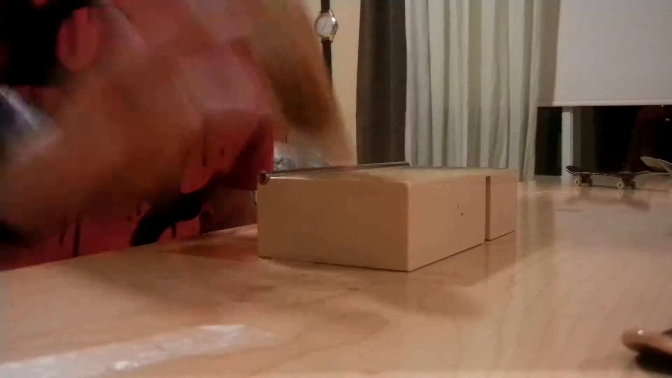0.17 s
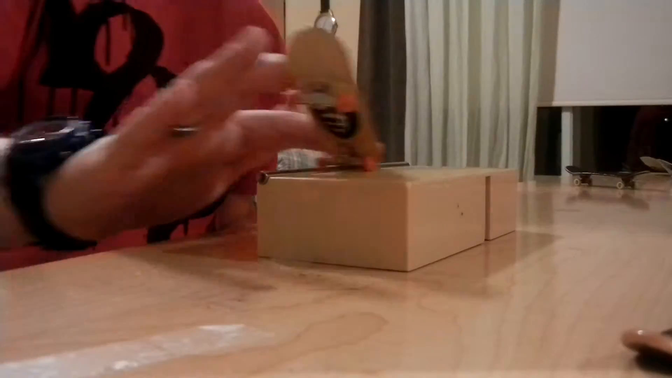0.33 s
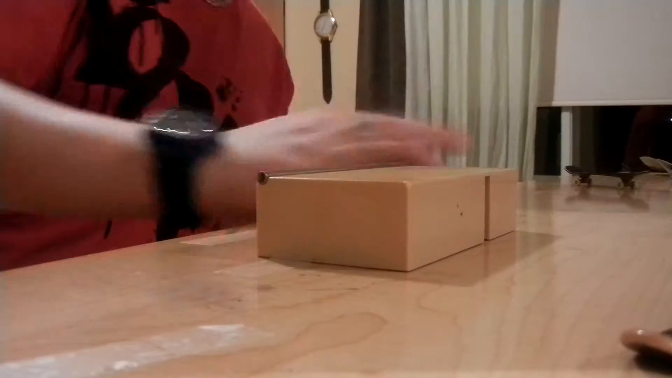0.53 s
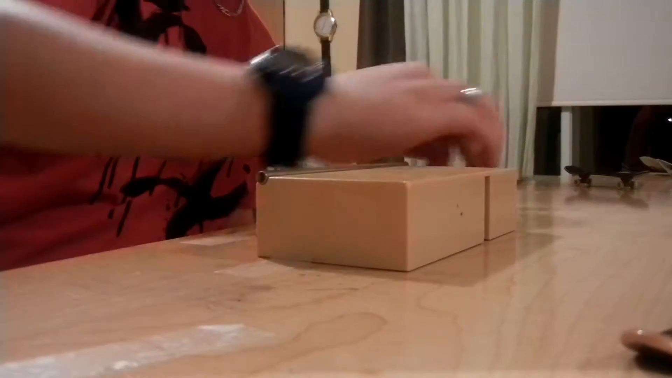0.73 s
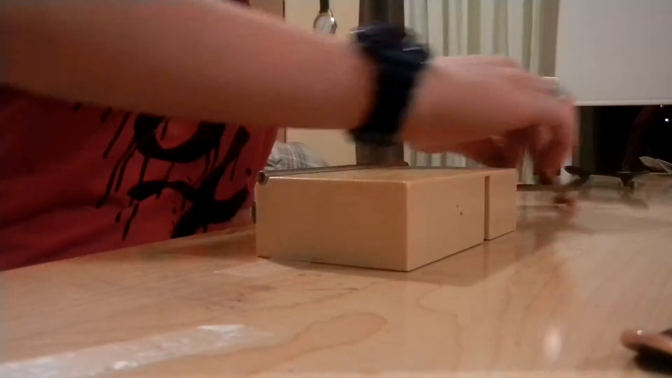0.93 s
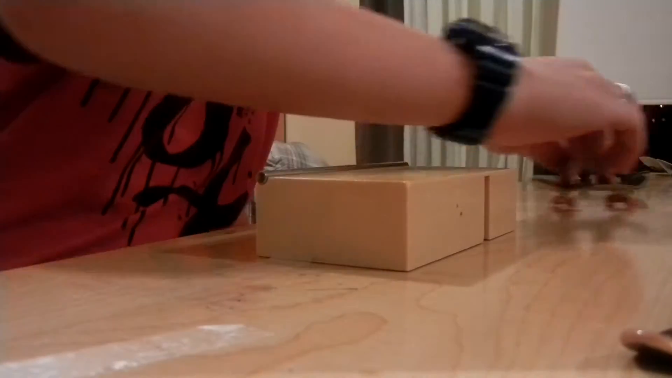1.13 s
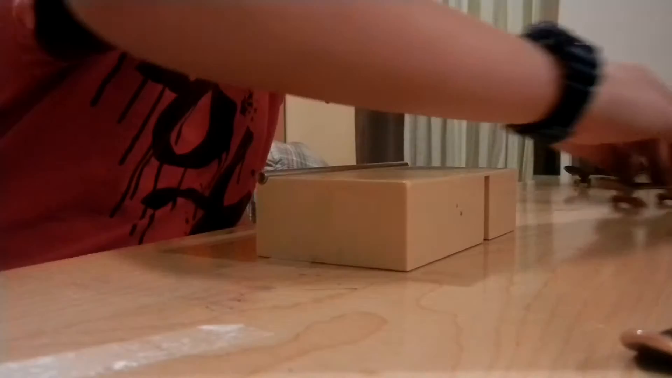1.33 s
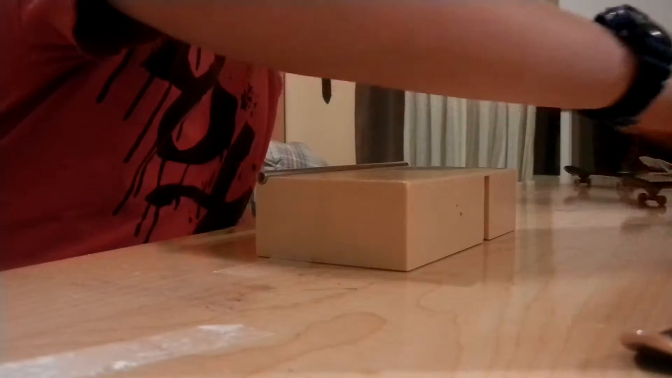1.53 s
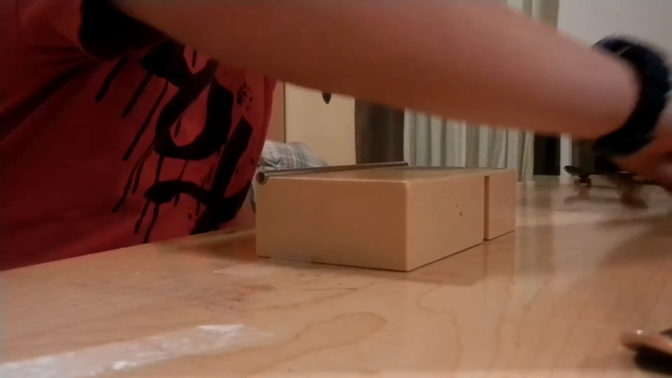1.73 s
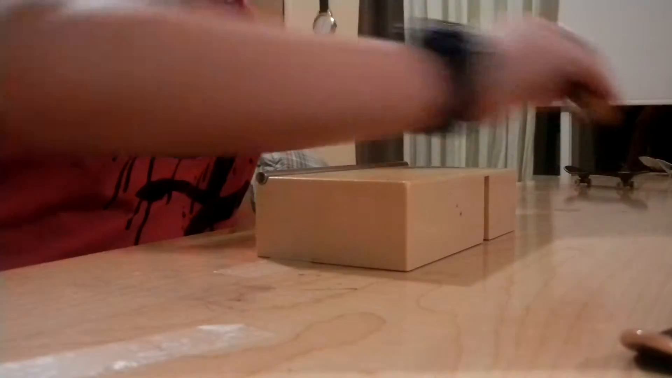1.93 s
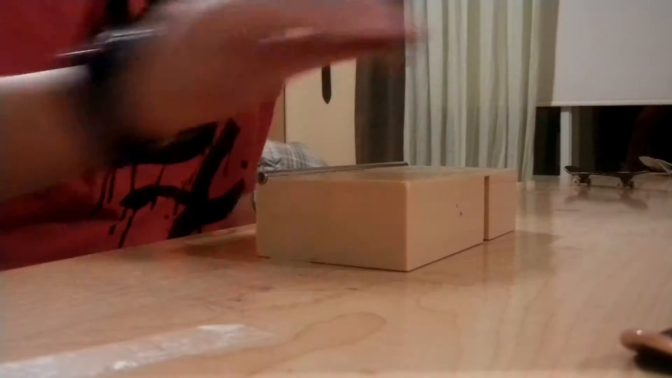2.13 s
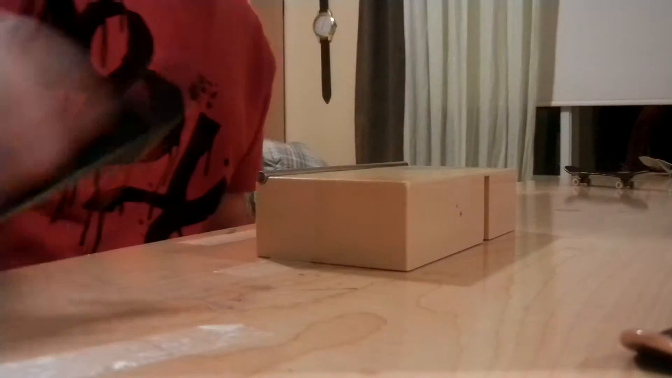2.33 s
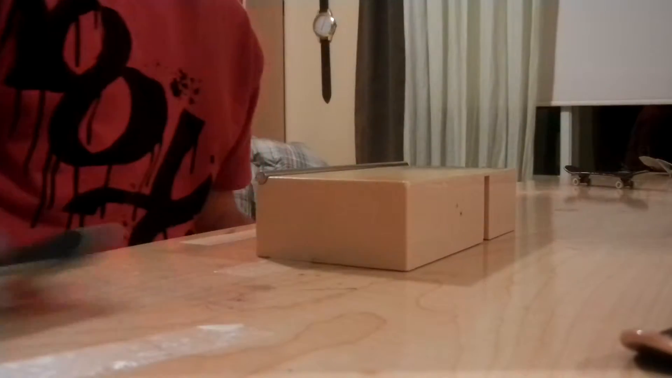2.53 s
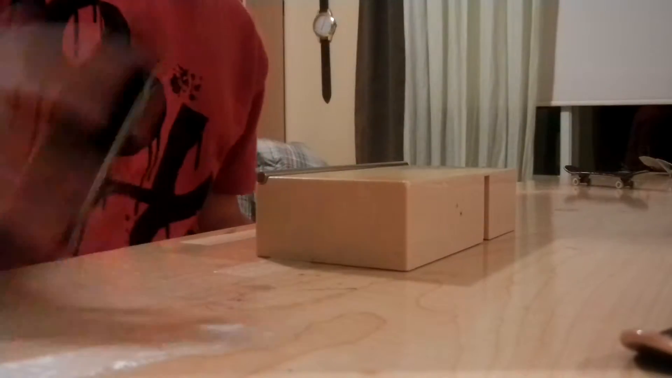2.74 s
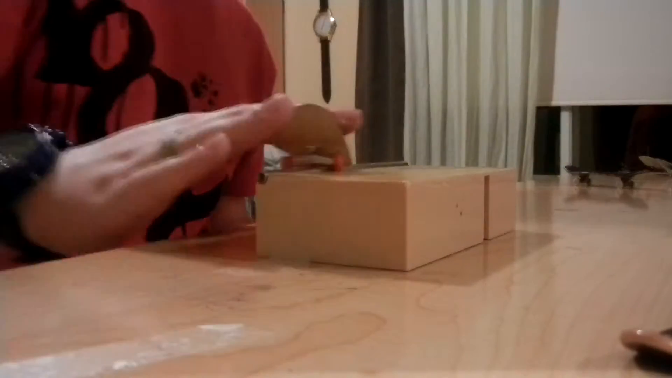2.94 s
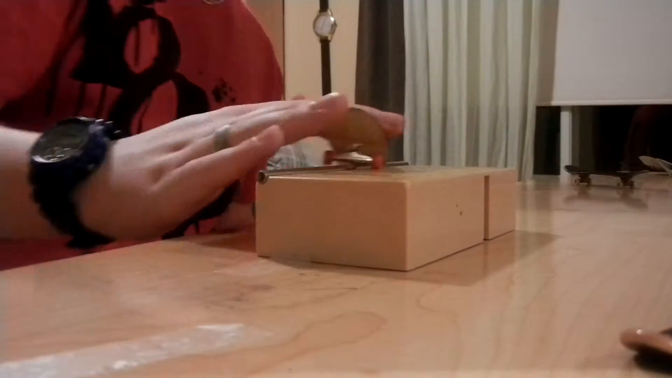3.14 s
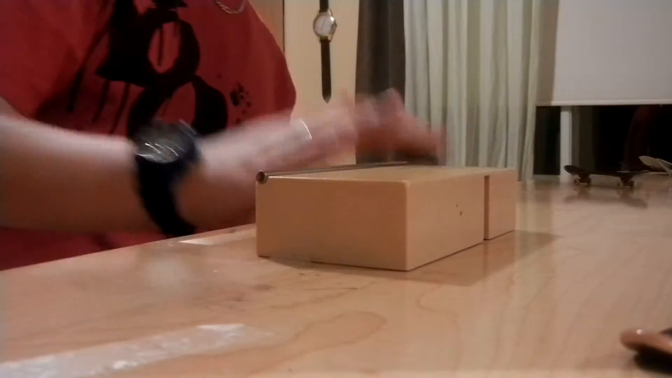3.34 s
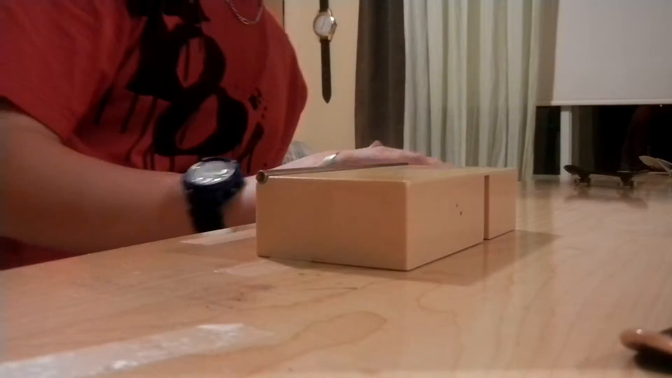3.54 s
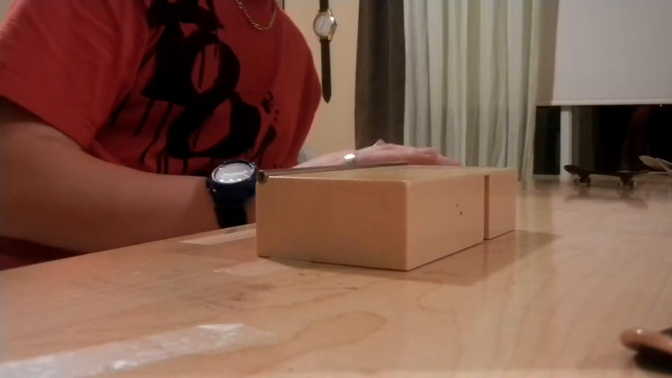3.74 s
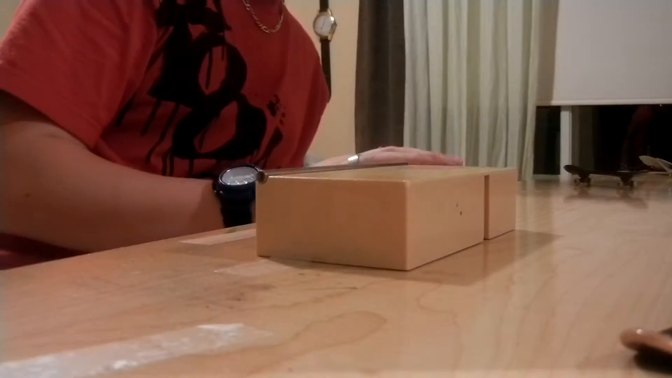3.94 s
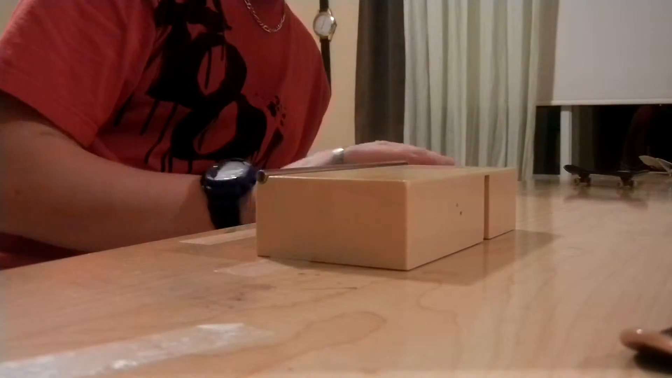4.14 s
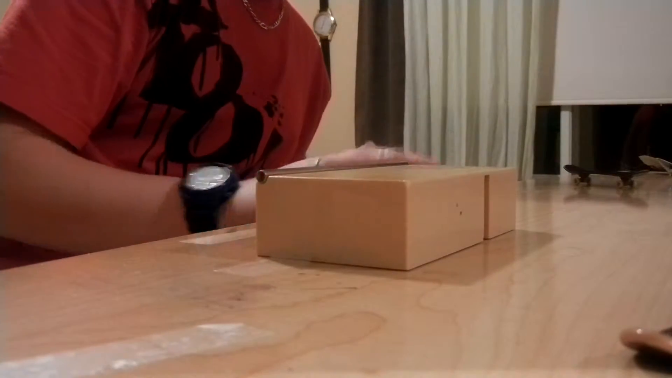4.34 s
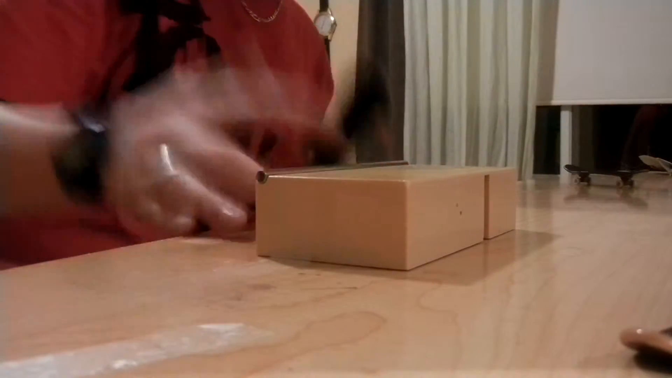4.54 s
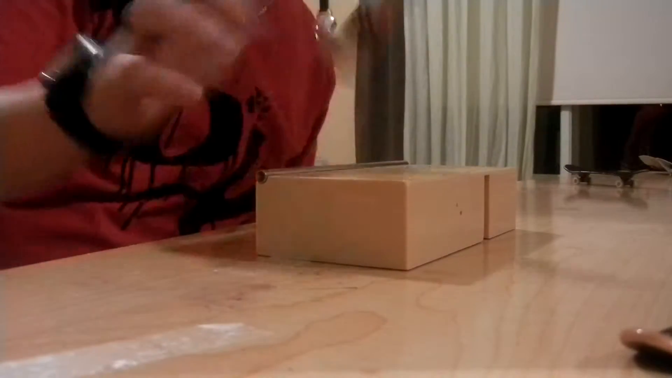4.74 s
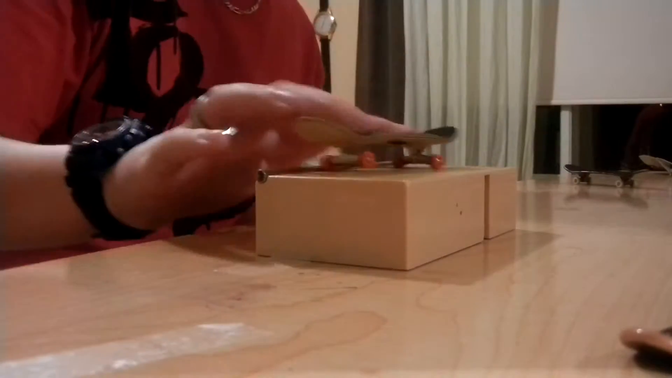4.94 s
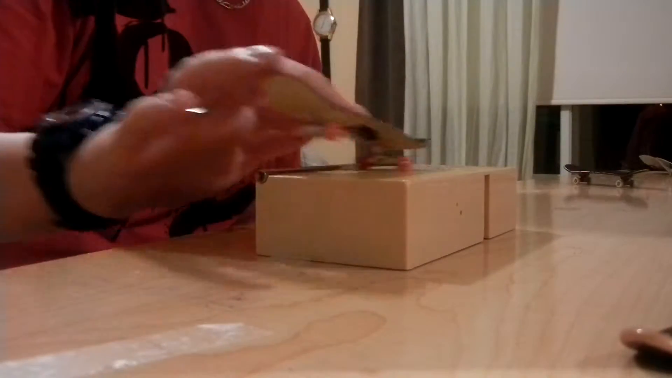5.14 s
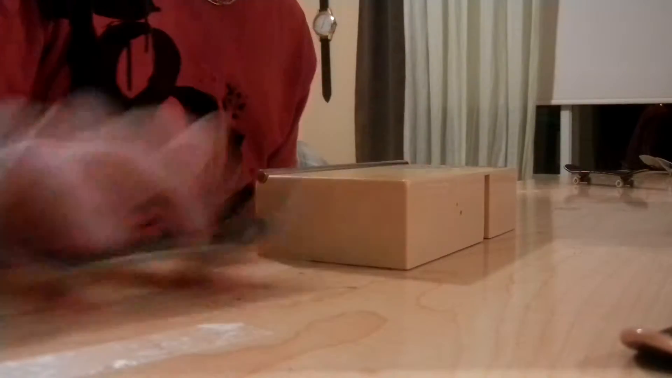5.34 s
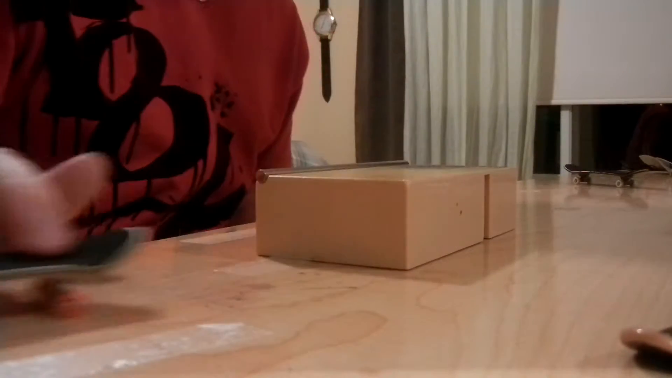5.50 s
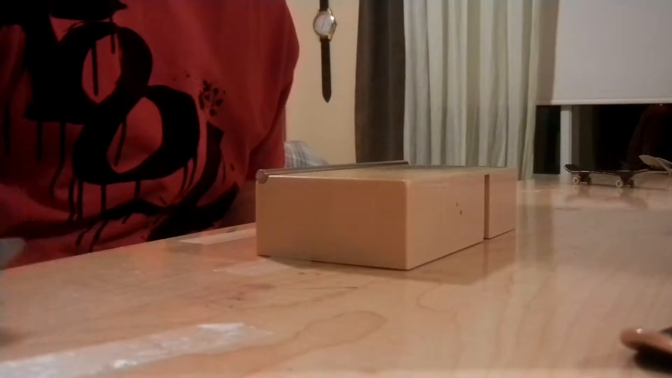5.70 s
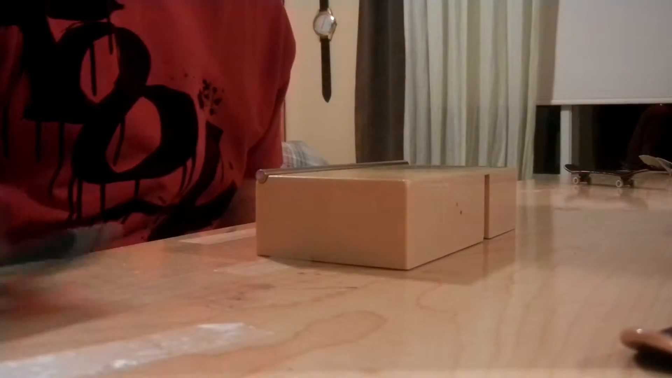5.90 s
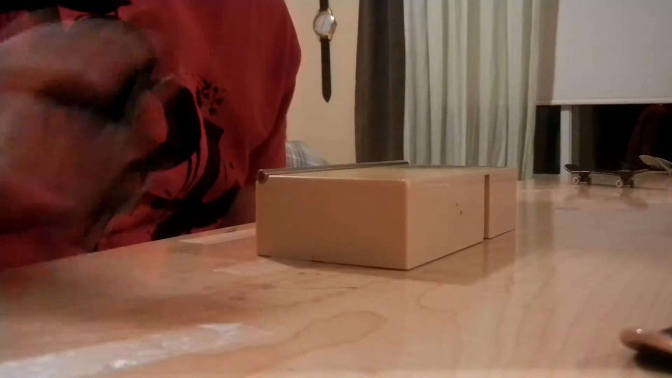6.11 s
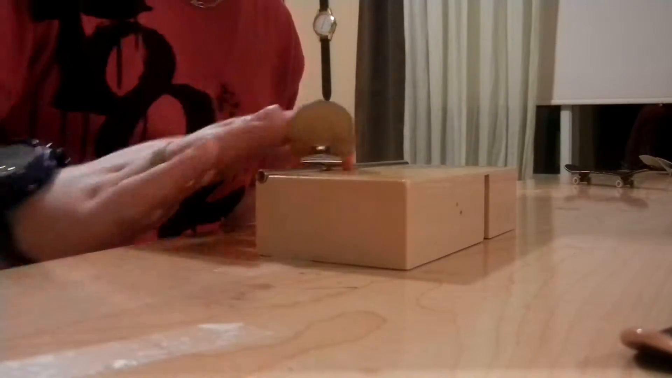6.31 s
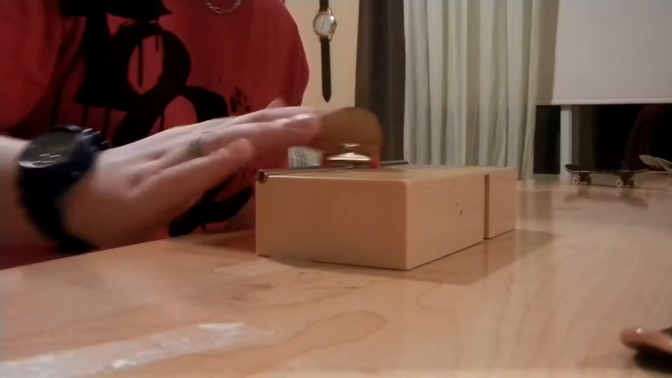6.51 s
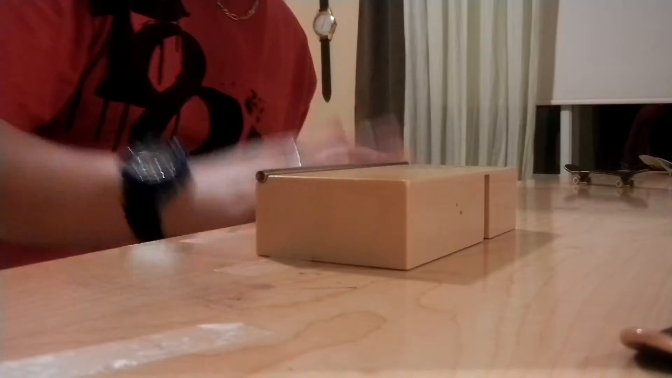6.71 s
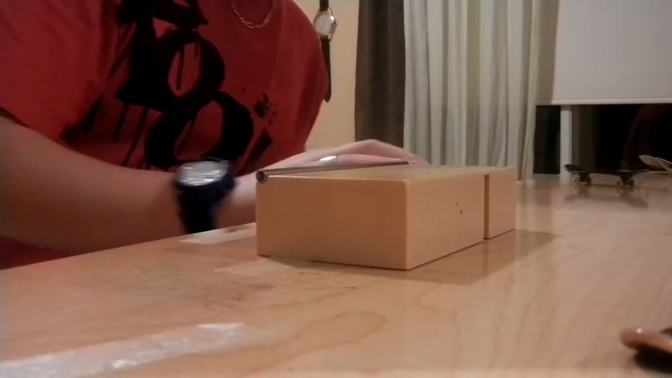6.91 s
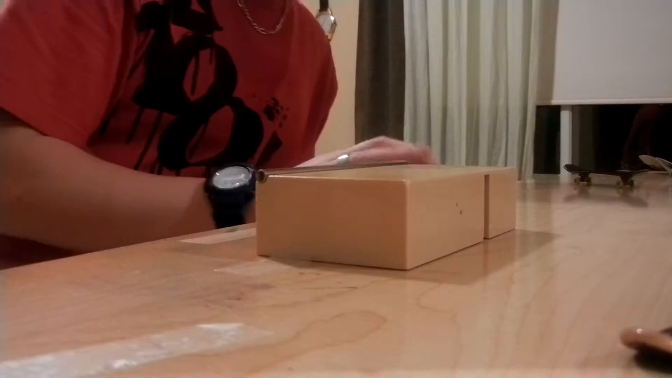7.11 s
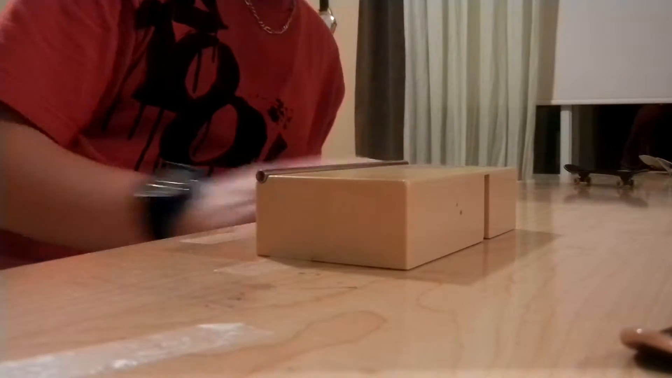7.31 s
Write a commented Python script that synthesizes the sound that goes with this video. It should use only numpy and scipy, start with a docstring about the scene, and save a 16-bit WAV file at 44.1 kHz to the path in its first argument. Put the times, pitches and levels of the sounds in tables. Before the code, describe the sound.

Close stereo sound in a small quiet room with a short echo. A trace of rolling and room noise cuts to silence, then returns at 0.12 s with the tail of a pop. The little board clacks onto a wooden box at 0.32, scrapes its metal edge with a hissing peak near 0.55, and smacks down at 0.65. From 0.8 to 1.6 the wheels skid sideways, growing louder in throbs and stuttering chirps. Soft taps and faint truck clicks follow around 1.9-2.2. Clacks at 2.5 and a rapid run-up at 2.7 lead to pops at 2.85-3.05, a swelling rasp to 3.4, landings to 3.7 and fading rolls. A whirring run-up at 4.6 pops, lands at 4.95, grinds until 5.4 and clacks at 5.49. Another run-up at 6.05, pops at 6.2-6.35, a grind to 6.75, double clack at 6.85, then light rolling until the end at about 7.4.

```python
"""A touch of rolling and room noise, a moment of silence, then the tail of a fingerboard pops.
Small room, wooden table, close stereo microphones: wheels roll on the grain as dense tiny impacts;
trucks land on a wooden box with struck modes and noise bursts, and grind and sing along its metal edge.
The board clacks back down; once the wheels skid sideways in throbs and stuttering chirps."""
import sys
import numpy as np
from scipy import signal
from scipy.fft import rfft, irfft
from scipy.io import wavfile
from scipy.ndimage import uniform_filter1d

SR = 44100
rng = np.random.default_rng(int(sys.argv[2]) if len(sys.argv) > 2 else 0)


def bounce(signal):
    """Save signal as a 16-bit WAV file at the path given by the first command-line argument."""
    frames = np.transpose(np.atleast_2d(signal))
    limited = np.clip(frames, -1, 1)
    pcm = np.round(limited * 32767).astype(np.int16)
    wavfile.write(sys.argv[1], SR, pcm)


N = 324576
T = np.arange(N) / SR  # time [s]
HIT_T = T[:SR // 3]  # time within one hit [s]
# Source levels are relative: the box and the room still act on them.


def undb(db):
    """Decibels to gain."""
    return 10 ** (np.asarray(db) / 20)


def unit(x):
    """Scale to rms 1."""
    return x / np.sqrt(np.mean(x ** 2))


def blow(x):
    """Scale a hit to the energy of 10 ms at rms 1."""
    return x / np.sqrt(np.sum(x ** 2) / (SR / 100))


def band(x, low_hz, high_hz):
    """Causal band-pass."""
    edges = [low_hz, min(high_hz, SR / 2 - 10)]
    sos = signal.butter(4, edges, "band", fs=SR, output="sos")
    return signal.sosfilt(sos, x + 1e-18)


def colour(x, points):
    """Causal minimum-phase filter with a (frequency [Hz], level [dB]) response."""
    hz, db = np.transpose(points)
    size = 4096
    bins_hz = np.arange(size // 2 + 1) * SR / size
    response_db = np.interp(np.log(bins_hz + 1), np.log(hz), db)
    cepstrum = irfft(np.log(undb(response_db)))
    # fold the cepstrum so that the response starts at once
    cepstrum[1:size // 2] *= 2
    cepstrum[size // 2 + 1:] = 0
    impulse = irfft(np.exp(rfft(cepstrum)))
    return signal.oaconvolve(x, impulse)[:len(x)]


def resonance(x, hz, width_hz):
    """One resonance, gain 1 at its centre."""
    return signal.lfilter(*signal.iirpeak(hz, hz / width_hz, fs=SR), x)


def fade(t, t60):
    """Exponential decay by 60 dB in t60 seconds."""
    return np.exp(-np.log(1000) * t / t60)


def burst(t60):
    """Noise that dies away."""
    return rng.standard_normal(len(HIT_T)) * fade(HIT_T, t60)


def flurry(x, t60):
    """Smear one contact into a quick run of smaller ones."""
    run = burst(t60) * (rng.random(len(HIT_T)) < 1500 / SR)
    run[0] = 1
    return signal.oaconvolve(x, run)[:len(x)]


def ring(modes, length=1, spread_db=2.0, detune=0.032):
    """Struck modes; shares and pitches depend on where the blow lands and how the fingers press."""
    hz, db, t60 = np.transpose(modes)[:, :, None]
    share, shift, side = rng.standard_normal((3, len(modes), 1))
    gain = np.sign(side) * undb(db + spread_db * share)
    tones = np.sin(2 * np.pi * hz * (1 + detune * shift) * HIT_T)
    return np.sum(gain * fade(HIT_T, t60 * length) * tones, axis=0)


def walk(rate):
    """Smooth random wander with rms 1, drawn anew about `rate` times a second."""
    k = int(SR / rate)
    steps = np.repeat(rng.standard_normal(N // k + 1), k)
    return unit(uniform_filter1d(uniform_filter1d(steps, k), k)[:N])


def song(hz, width_hz):
    """A narrow resonance that friction keeps ringing while its pitch moves."""
    phase = 2 * np.pi * np.cumsum(hz) / SR
    return unit(walk(width_hz) * np.sin(phase) + walk(width_hz) * np.cos(phase))


def stroke(start_s, hold_s, rise_db_per_s, fall_db_per_s, slope_db_per_s=0):
    """Gain of one movement: it swells up to its start, holds along a slope, then dies away."""
    t = T - start_s
    rise = rise_db_per_s * np.minimum(t, 0)
    slope = slope_db_per_s * np.clip(t, 0, hold_s)
    fall = fall_db_per_s * np.maximum(t - hold_s, 0)
    return undb(np.maximum(rise + slope - fall, -160))


def scattered(start_s, length_s, count):
    """Uneven moments spread over a stretch of time."""
    return start_s + length_s * (np.arange(count) + rng.random(count)) / count


def add(out, s, sound):
    """Mix a sound in at time s."""
    i = max(int(s * SR), 0)
    out[i:i + len(sound)] += sound[:N - i]


# Spectrum of the quiet room: (frequency [Hz], level [dB])
AIR = [(25, -5), (60, 4), (200, 7), (400, -2.5), (1500, -2.5), (3300, -1.5), (4500, -10), (8000, -13.5),
       (15000, -14.5)]
AIR_DB = -52  # the part common to both microphones


def air():
    """Quiet room noise, partly different at the two microphones."""
    shared, left, right = (unit(colour(rng.standard_normal(N), AIR)) for _ in range(3))
    return undb(AIR_DB) * (shared + undb(4.5) * np.array([left, right]))


# Room echo by band: (low edge [Hz], high edge [Hz], level [dB], t60 [s])
ROOM = [(48, 334, -9.5, 0.38), (374, 1210, -12.5, 0.29), (1550, 5200, -9.5, 0.3), (4320, 13600, -10.5, .34)]


def room(x, first_s=0.0015):
    """Diffuse echo of a small furnished room: fading noise in each band."""
    t = T[:SR * 2 // 3]
    response = 0
    for low_hz, high_hz, db, t60 in ROOM:
        tail = rng.standard_normal(len(t)) * fade(t, t60) * (t > first_s)
        response = response + undb(db) * band(tail / np.linalg.norm(tail), low_hz, high_hz)
    return signal.oaconvolve(x, response)[:N]


# Difference between left and right: (frequency [Hz], side level [dB])
WIDTH = [(30, -10), (130, -20), (1200, -20), (2500, -15), (5000, -9), (9000, -7), (15000, -7)]


def stereo(x, scatter_t60=0.066):
    """Reflections off table and walls reach left and right differently, most of all in the treble."""
    scatter = burst(scatter_t60)
    scattered_sound = signal.oaconvolve(x, scatter / np.linalg.norm(scatter))[:N]
    side = colour(scattered_sound, WIDTH)
    return np.array([x + side, x - side])


# Sharp resonances of box, rail and hardware: (frequency [Hz], width [Hz], gain [dB])
BOX = [(541.8, 13.7, 1), (661, 5.4, 0), (912, 4.8, -15), (1220, 7.1, -20), (1452, 19, -9), (2330, 16, -21),
       (3540, 38, -21), (5170, 53, -4), (7210, 53, -3), (12600, 89, -7)]


def box(board):
    """Box, rail and hardware ring along with every sound of the board."""
    ringing = sum(undb(db) * resonance(board, hz, width_hz) for hz, width_hz, db in BOX)
    return undb(-1.0) * (board + ringing)


# Heavy presses of hand and board, pitched by the spot: (time [s], level [dB], pitch [Hz])
BUMPS = [(0.129, -24, 126), (1.869, -35, 103.6), (3.021, -20, 76.2), (4.25, -30, 163), (4.301, -27, 146),
         (4.662, -16, 299), (5.49, -22, 136), (5.882, -29, 100), (6.019, -21.5, 121), (6.346, -19, 162)]


def booms(t60=0.15, push_s=0.0019):
    """A soft, heavy push swells into a low pair of table modes."""
    out = np.zeros(N)
    for s, db, hz in BUMPS:
        pair = ring([(hz, 0, t60), (1.3 * hz, -7, 0.6 * t60)], detune=0.0038)
        boom = pair * (1 - np.exp(-HIT_T / push_s))
        add(out, s, undb(db) * blow(boom))
    return out


# Spectrum of a hard contact: (frequency [Hz], level [dB])
TICK_COLOUR = [(2000, 6), (4000, -3), (5500, 0), (8000, -3), (10500, -4), (12500, -3.5), (16000, -30)]


def tick(t60=0.011, rattle_db=-18, rattle_t60=0.15):
    """Hard contact, then a brief rattle of the truck hardware."""
    return blow(colour(burst(t60) + undb(rattle_db) * burst(rattle_t60), TICK_COLOUR))


# Modes of deck and trucks: (frequency [Hz], level [dB], t60 [s] before each hit scales it)
DECK = [(651, -3.5, 0.018), (773, -7, 0.12), (920, -6, 0.039), (1138, -8, 0.016), (1294, -6, 0.14),
        (1466, -1.5, 0.041), (1633, 1.5, 0.048), (1892, 4, 0.012), (2153, 5.5, 0.017), (2428, 6, 0.018),
        (2672, 4, 0.024), (2812, -3.5, 0.043), (3270, -0.5, 0.039), (3644, -5.5, 0.08), (3810, -2.5, 0.016)]
# Light touches of wheels and trucks: (time [s], deck level [dB], hard tick level [dB])
TAPS = [(1.855, -22, -42), (1.912, -20, -34), (1.927, -40, -32), (2.485, -45, -39.5), (2.841, -20.5, -39),
        (3.216, -23.5, -33), (3.279, -25, -42), (3.312, -21, -48), (3.331, -12, -44), (4.105, -28, -48),
        (4.422, -23, -58), (5.255, -21.5, -39), (6.192, -19.5, -32.5), (7.2, -20, -47), (7.351, -21, -62)]
# loose trucks click faintly while the board is carried back through the air
CARRY_S, CARRY_LENGTH_S, CARRY_DECK_DB, CARRY_TICK_DB = 1.98, 0.18, -52, -45.5


def taps():
    """Light, scuffing touches ring only the board; its trucks click as it is carried."""
    out = np.zeros(N)
    moments = scattered(CARRY_S, CARRY_LENGTH_S, count=4)
    clicks = [(s, CARRY_DECK_DB, CARRY_TICK_DB) for s in moments]
    for s, deck_db, tick_db in TAPS + clicks:
        scuff = blow(flurry(ring(DECK, length=0.91), t60=0.054))
        add(out, s, undb(deck_db) * scuff + undb(tick_db) * tick(t60=0.0057))
    return out


# Modes of table and box: (frequency [Hz], level [dB], t60 [s] before each hit scales it)
TABLE = [(72.6, -16, 0.47), (111, -11, 0.13), (138.3, 1.5, 0.12), (213, 7, 0.21), (204, 3.5, 0.087),
         (293.3, 1, 0.23), (348, -3.5, 0.08), (457, -0.5, 0.1), (545, -1.5, 0.17)]
# Pops and landings: (time [s], deck clack level [dB], table thud level [dB], hard tick level [dB])
CLACKS = [(0.1256, -15.5, -19, -16.5), (0.1352, -22, -29, -25), (0.3199, -8.5, -17, -17.5),
          (0.3264, -17, -25, -18), (0.6505, -7.5, -36, -21), (0.662, -19, -51, -23.5),
          (2.5308, -12, -18, -17), (2.5765, -10, -25, -20.5), (2.8534, -13.5, -18.5, -15),
          (3.0143, -11.5, -18, -14.5), (3.0443, -11, -17, -16.5), (3.4663, -15, -18, -25),
          (3.5205, -10, -22.5, -12.5), (3.6842, -15.5, -23, -31), (4.6593, -14, -17, -17.5),
          (4.949, -12, -20.5, -10), (4.9728, -10, -30, -26), (4.9892, -13, -43, -23),
          (5.1941, -20.5, -35, -30.5), (5.486, -13.5, -20, -12.5), (5.497, -12, -24, -35),
          (6.2074, -14, -17.5, -14.5), (6.3415, -13.5, -24, -15.5), (6.348, -12.5, -18.5, -13),
          (6.8219, -11, -18.5, -28), (6.852, -9.5, -26, -16)]
# after each blow the deck drops back once more, softly: mean delay, level against the blow
REBOUND_S, REBOUND_DB = 0.007, -10.5


def clacks():
    """Each pop or landing cracks, rings the deck and thuds through the wood; the deck rebounds."""
    out = np.zeros(N)
    for s, deck_db, thud_db, tick_db in CLACKS:
        crack = blow(band(burst(0.031), 653, 3730))
        deck = blow(blow(ring(DECK, length=0.63)) + undb(-2) * crack)
        wood = blow(ring(TABLE, length=0.5, spread_db=2, detune=0.08))
        thud = blow(wood + undb(-3) * blow(band(burst(0.04), 85, 600)))
        add(out, s, undb(deck_db) * deck + undb(thud_db) * thud + undb(tick_db) * tick())
        rebound_s = s + REBOUND_S * (0.5 + rng.random())
        add(out, rebound_s, undb(deck_db + REBOUND_DB) * deck)
    return out


GRIT_PER_S, GRIT_DB = 120, -8  # coarse nicks that catch the board; level against the fine grain


def contact(spectrum, grains_per_s, grain_db, judder_db):
    """Tiny surface bumps strike the moving board: the table's rumble, the body's ring and the hiss."""
    hits = rng.random(N) < grains_per_s / SR
    sizes = undb(grain_db * np.minimum(rng.exponential(size=N), 4))
    grains = hits * rng.choice([-1, 1], N) * sizes
    grains = grains * undb(judder_db * walk(140))  # finger pressure and uneven wheels
    surface = colour(grains, spectrum)
    wood = signal.oaconvolve(grains, ring(TABLE, detune=0.0032))[:N]
    rumble = unit(band(surface, 99, 428)) + undb(-4.5) * unit(wood)
    nicks = (rng.random(N) < GRIT_PER_S / SR) * rng.choice([-1, 1], N)
    jolts = unit(surface) + undb(GRIT_DB) * unit(colour(nicks, spectrum))
    # as the contact point travels, it favours one mode of the deck after another
    modes = sum(undb(db + 9 * np.tanh(walk(22))) * resonance(jolts, hz, 110) for hz, db, _ in DECK)
    body = unit(band(jolts, 530, 7700)) + undb(-1) * unit(modes)
    # narrow treble bands at fixed pitches glint, each swelling and fading by itself
    glint_hz = rng.uniform(5000, 14000, size=14)
    glints = sum(undb(10 * np.tanh(walk(16))) * resonance(surface, hz, 160) for hz in glint_hz)
    hiss = unit(band(surface, 4220, 17300)) + undb(-2) * unit(band(glints, 3800, 19400))
    return unit(rumble), unit(body), unit(hiss)


# grip and release of the wheels: rate, one moment of full grip, depth
CHATTER_HZ, CHATTER_GRIP_S, CHATTER_DB = 10.66, 0.97, 3


def chatter(s):
    """Level in dB of the throbbing grip of skidding wheels at time s."""
    return CHATTER_DB * np.cos(2 * np.pi * CHATTER_HZ * (s - CHATTER_GRIP_S))


# Contact spectrum of the skid: (frequency [Hz], level [dB])
SKID_COLOUR = [(80, -36), (400, -19), (530, -13), (750, -18), (1100, -3), (1600, 1.5), (2100, -11),
               (3500, -19), (4600, -32.5), (9500, -41.5), (12500, -34), (15000, -41)]
# Pitch of the skidding wheels, lower by the end as they slow: (time [s], pitch [Hz])
SKID_PITCH = [(0.82, 1700), (1.27, 1725), (1.43, 1335), (1.54, 1500), (1.6, 1220)]
# Most prominent slips of the skidding wheels: (time [s], level [dB])
SLIPS = [(0.875, -16), (0.969, -12), (0.987, -9), (1.046, -11.5), (1.07, -11), (1.153, -17), (1.178, -11),
         (1.243, -10.5), (1.262, -15.5), (1.367, -9.5), (1.441, -19), (1.591, -11.5)]
# one sideways drag, pressed steadily harder, with small slips all along it
SKID_S, SKID_LENGTH_S, SKID_DB, SKID_GROWTH_DB_PER_S = 0.82, 0.775, -27, 13
SMALL_SLIP_DB, SMALL_SLIP_SPREAD_DB = -19.5, 3  # around the chatter
ROLL_ATTACK_DB_PER_S, ROLL_RELEASE_DB_PER_S = 1100, 504  # shared by skid and roll; grinds use the attack


def skidding():
    """Wheels rub sideways in throbs; each slip stutters a damped chirp that shakes the deck."""
    rumble, body, hiss = contact(SKID_COLOUR, grains_per_s=1500, grain_db=0.0, judder_db=2.5)
    drag = undb(SKID_DB) * stroke(SKID_S, SKID_LENGTH_S, ROLL_ATTACK_DB_PER_S,
                                  ROLL_RELEASE_DB_PER_S, SKID_GROWTH_DB_PER_S)
    out = (undb(-21.5) * rumble + body * undb(chatter(T)) + undb(-22) * hiss) * drag
    small = []
    for s in scattered(SKID_S, SKID_LENGTH_S, count=22):
        small.append((s, SMALL_SLIP_DB + chatter(s) + SMALL_SLIP_SPREAD_DB * rng.standard_normal()))
    for s, db in SLIPS + small:
        hz = np.interp(s, *np.transpose(SKID_PITCH))
        chirp = ring([(hz, 0, 0.02), (0.714 * hz, -9, 0.014), (2.175 * hz, -14, 0.01)], detune=0.036)
        shake = undb(-13.5) * blow(ring(DECK, length=1.0))
        stutter = blow(band(flurry(blow(chirp) + shake, t60=0.022), 956, 3650))
        add(out, s, undb(db) * (stutter + undb(-29) * tick(t60=0.022)))
    return out


# the scrape just after landing dies away
SETTLE_DB, SETTLE_HISS_DB, SETTLE_DB_PER_S = -25.5, -34, 102
BITE_SAG_DB_PER_S, GRIND_RELEASE_DB_PER_S = -39, 466
# the hiss peaks as the truck runs off the end
HISS_SWELL_DB_PER_S, HISS_HOLD_S, HISS_RELEASE_DB_PER_S = 225, 0.0067, 404
# the edge sings lower as the truck travels along it, down to its song pitch
EDGE_TOP_HZ, EDGE_SAG_HZ_PER_S, SONG_SWELL_DB_PER_S = 1410, 900, 102
# the truck's screech climbs as it bites; level against the hiss
SCREECH_HZ, SCREECH_RISE_HZ_PER_S, SCREECH_DB = 2750, 5500, -3.5
# Contact spectrum of truck on metal edge: (frequency [Hz], level [dB])
GRIND_COLOUR = [(35, -66), (60, -37), (209, -28.5), (390, -38.5), (539, -16.5), (591, -12), (982, -1),
                (1080, -6), (1330, 3), (1830, -5), (2840, -4.5), (4730, -18), (7330, -19), (12800, -28.5),
                (15000, -34)]
# Grinds along the metal edge: (landing time [s], hardest bite time [s], bite length [s], level [dB],
# swell [dB/s], hiss level [dB], song level [dB], song pitch [Hz])
GRINDS = [(0.321, 0.544, 0.026, -14.5, 185, -12.5, -24.5, 1253),
          (3.071, 3.322, 0.078, -11.5, 250, -23.5, -24.5, 1340),
          (5.013, 5.371, 0.017, -13.5, 132, -22.5, -25, 1140),
          (6.384, 6.704, 0.055, -11.5, 118, -18, -28, 1320)]


def grinding():
    """Metal trucks land, settle, bite ever harder, rasp and hiss until they run off; the edge sings."""
    rumble, body, hiss = contact(GRIND_COLOUR, grains_per_s=8000, grain_db=1.5, judder_db=3.5)
    force = bite = edge = 0
    for land_s, bite_s, length_s, db, swell, hiss_db, song_db, song_hz in GRINDS:
        on_edge = T > land_s
        settle = stroke(land_s, 0, ROLL_ATTACK_DB_PER_S, SETTLE_DB_PER_S)
        press = stroke(bite_s, length_s, swell, GRIND_RELEASE_DB_PER_S, BITE_SAG_DB_PER_S)
        run_off_s = bite_s + length_s - HISS_HOLD_S / 2
        run_off = stroke(run_off_s, HISS_HOLD_S, HISS_SWELL_DB_PER_S, HISS_RELEASE_DB_PER_S)
        force = force + undb(SETTLE_DB) * settle + undb(db) * press * on_edge
        bite = bite + undb(SETTLE_HISS_DB) * settle ** 2 + undb(hiss_db) * run_off * on_edge
        hz = np.clip(song_hz - EDGE_SAG_HZ_PER_S * (T - bite_s), song_hz, EDGE_TOP_HZ)
        hz = hz * (1 + 0.035 * walk(25))  # the pitch wavers
        song_swell = stroke(bite_s, length_s, SONG_SWELL_DB_PER_S, GRIND_RELEASE_DB_PER_S)
        sings = undb(song_db) * song_swell * on_edge + undb(-34.5) * settle
        screech_hz = SCREECH_HZ + SCREECH_RISE_HZ_PER_S * np.clip(T - bite_s, -0.15, 0.15)
        screech = undb(hiss_db + SCREECH_DB) * run_off * on_edge * song(screech_hz, width_hz=700)
        edge = edge + sings * song(hz, width_hz=170) + screech
    rasp = unit(band(body, 2280, 4800))
    treble = undb(-1.5) * hiss + undb(-3.5) * rasp
    return undb(-26) * rumble * force ** 0.33 + undb(-2.5) * body * force + treble * bite + edge


SURGE_DB = 1.0  # the fingers press unevenly on the rolling board
WHIRR_HZ_PER_DB = 2.5  # the whirr sinks as the wheels turn slower
# Contact spectrum of wheels on the grain: (frequency [Hz], level [dB])
ROLL_COLOUR = [(35, 10), (60, -35.5), (199, -17.5), (390, -12), (480, -8), (577, -3.5), (895, 3),
               (1710, -4), (2110, -3.5), (2980, -10.5), (3660, -9.5), (4410, -26), (5430, -17.5),
               (11600, -30.5), (15000, -30)]
# Rolls that gain or lose speed evenly: (start time [s], length [s], level [dB], change [dB/s])
ROLLS = [(0, 0.01, -34.5, 0), (0.267, 0.018, -31.5, -120), (0.692, 0.13, -29, -43), (1.847, 0.059, -34, 30),
         (2.163, 0.037, -33.5, 0), (2.557, 0.02, -14.5, -150), (2.644, 0.012, -25.5, 0),
         (3.552, 0.44, -29.5, -14.5), (3.711, 0.17, -23, -29), (4.171, 0.23, -27, -12),
         (4.908, 0.022, -37, 60), (5.516, 0.19, -23, -33), (5.73, 0.15, -24, 9), (6.885, 0.18, -27.5, 13),
         (7.047, 0.24, -22.5, -35)]
# Fast run-ups before a trick: (top speed time [s], held [s], level [dB], swell [dB/s],
# whirr pitch [Hz], whirr level [dB], bearing hiss level [dB])
PUSHES = [(2.703, 0.053, -13, 300.5, 970, -30, -56), (4.57, 0.067, -11.5, 130, 2130, -16, -36.5),
          (6.038, 0.072, -10.5, 310, 927, -20, -44)]


def rolling():
    """Wheels on the table: rumble grows slowly with speed, the board's ring fast; run-ups whirr."""
    rumble, body, hiss = contact(ROLL_COLOUR, grains_per_s=2400, grain_db=3.0, judder_db=1.7)
    speed = whirr = 0
    for s, length_s, db, change in ROLLS:
        roll = stroke(s, length_s, ROLL_ATTACK_DB_PER_S, ROLL_RELEASE_DB_PER_S, change)
        speed = speed + undb(db) * roll
    speed = speed * undb(SURGE_DB * walk(30))
    for s, held_s, db, swell, whirr_hz, whirr_db, hiss_db in PUSHES:
        push = stroke(s, held_s, swell, ROLL_RELEASE_DB_PER_S)
        speed = speed + undb(db) * push
        hz = whirr_hz + WHIRR_HZ_PER_DB * 20 * np.log10(push)
        whirr = whirr + push * (undb(whirr_db) * song(hz, width_hz=300) + undb(hiss_db) * hiss)
    low = undb(-25) * rumble * speed ** 0.5
    return low + undb(-1.5) * body * speed + undb(-22.5) * hiss * speed ** 0.84 + whirr


def scene():
    """Board, table and box in the room."""
    board = box(booms() + taps() + clacks() + skidding() + grinding() + rolling())
    # little deep bass is heard below about 55 Hz
    board = signal.sosfilt(signal.butter(2, 55, "high", fs=SR, output="sos"), board)
    return stereo(board + room(board)) + air()


# Brief silence near the start: (from [s], to [s])
DROPOUT = (0.031, 0.118)
TOP_HZ = 15900  # nothing is heard much above this


def record(dry, ceiling=1.12):
    """The loudest clacks overload the microphone; the sound drops out briefly near the start."""
    rounded = dry / (1 + (dry / ceiling) ** 4) ** (1 / 4)
    live = (T < DROPOUT[0]) | (T > DROPOUT[1])
    low_pass = signal.ellip(8, 0.2, 70, TOP_HZ, fs=SR, output="sos")
    return signal.sosfilt(low_pass, rounded * live)


dry = scene()
out = record(dry)
bounce(out)
```